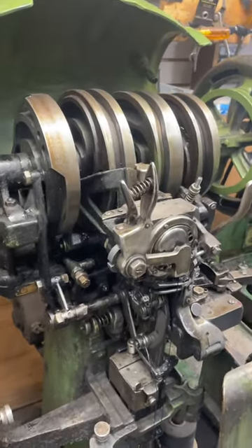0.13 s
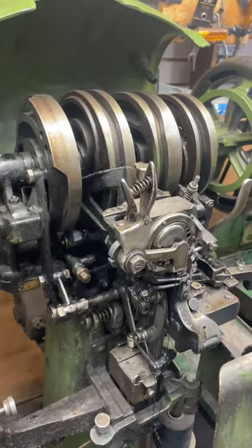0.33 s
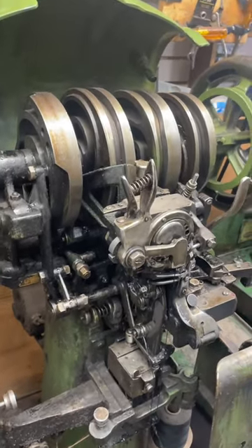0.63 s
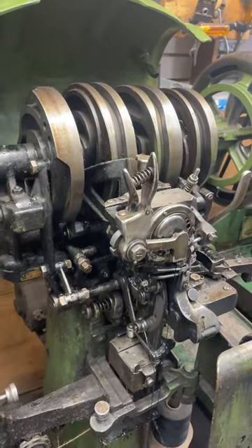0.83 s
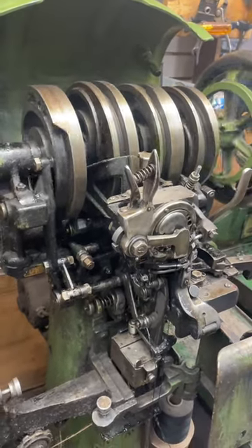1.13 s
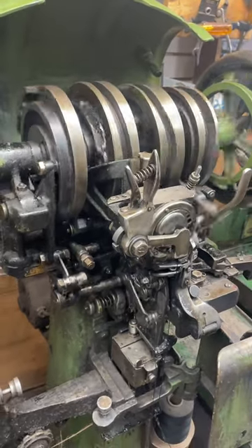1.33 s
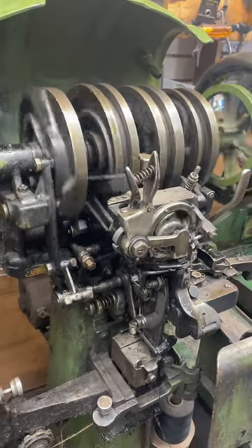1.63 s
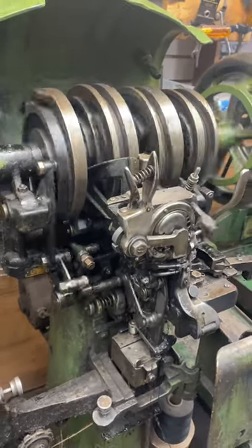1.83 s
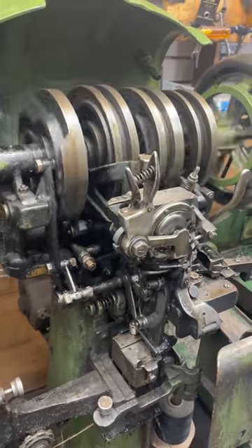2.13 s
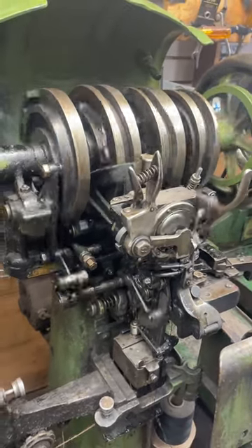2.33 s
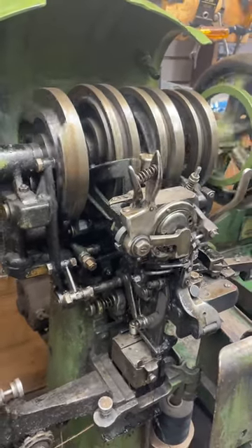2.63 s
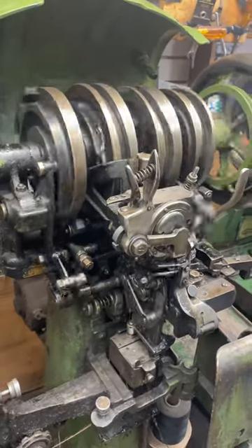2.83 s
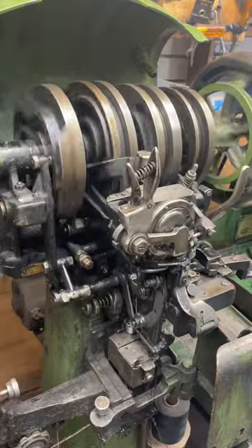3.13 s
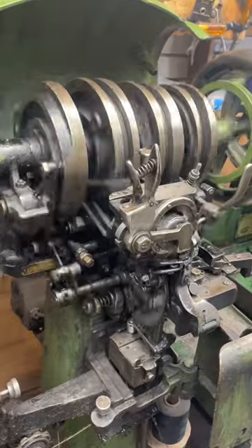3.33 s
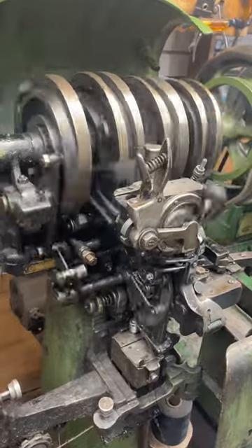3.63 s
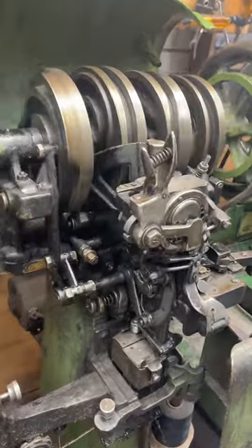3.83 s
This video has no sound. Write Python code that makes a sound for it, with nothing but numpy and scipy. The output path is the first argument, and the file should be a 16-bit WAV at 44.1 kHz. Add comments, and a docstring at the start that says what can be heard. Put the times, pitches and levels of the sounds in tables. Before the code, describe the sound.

Close up in a small workshop, an industrial stitcher hums quietly, engages with a clunk and a brief hiss, then clatters through repeating metallic strokes that speed up, with dull thuds, tiny squeaks and rattling joints.

```python
"""A heavy sole stitcher in a small workshop, heard from close by. Its motor hums, the clutch clunks in and
slips with a hiss, then the camshaft turns about six times, gathering speed. On each turn the same levers strike
in the same order, each impact exciting that part's own damped resonances. The heavy blows thud in a low mode of
the cast frame and the thread gives brief squeaks of falling pitch with each slide stroke, over gear rumble and
loose rattle."""
import sys
import numpy as np
from scipy import signal
from scipy.fft import rfft, irfft, next_fast_len
from scipy.io import wavfile
from scipy.ndimage import uniform_filter1d

SR = 44100
rng = np.random.default_rng(int(sys.argv[2]) if len(sys.argv) > 2 else 0)


def to_wav(s):
    """Save 16-bit WAV."""
    ch = np.atleast_2d(s).T  # columns
    pcm = np.round(np.clip(ch, -1, 1) * 32767)  # PCM
    wavfile.write(sys.argv[1], SR, pcm.astype(np.int16))


N = 176400

# Strokes of the clutch, then of each part in its order within a turn: start_s, level_db
CLUTCH = [(0.743, -18), (0.76, -22.5)]
FEED_KNOCK = [(1.2265, -22.5), (1.8167, -8), (2.271, -8), (2.7742, -10), (3.2532, -9), (3.582, -8),
              (3.8861, -11)]
PAWL_CLICK = [(1.3493, -12.5), (1.8793, -8), (2.3387, -8.5), (2.8534, -10), (3.3055, -6.5), (3.6115, -5),
              (3.916, -6.5)]
LEVER_CLACK = [(1.3953, -6), (1.9017, -2.5), (2.365, -2), (2.881, -4), (3.3247, -3), (3.6325, -3.5),
               (3.6449, -5.5), (3.9362, -7.5), (3.949, -7.5)]
SPRING_RETURN = [(1.4571, -9.5), (1.9539, -7), (2.4227, -13), (2.9452, -14), (3.362, -5), (3.67, -10),
                 (3.9829, -12)]
LATCH_TICK = [(1.5514, -11.5), (2.0203, -11.5), (2.4955, -11.5), (3.018, -13), (3.4143, -9.5),
              (3.7229, -7.5)]
AWL_PUNCH = [(1.5838, -24), (2.0464, -19), (2.5222, -22), (3.0453, -21), (3.4311, -14.5), (3.7397, -15)]
AWL_REBOUND = [(1.6096, -14), (2.0696, -9.5), (2.55, -13), (3.0699, -12.5), (3.4477, -9), (3.7556, -10.5)]
SLIDE_SCRAPE = [(1.6681, -7.5), (2.1218, -5), (2.6081, -8), (3.1241, -6), (3.4856, -1.5), (3.7911, -4.5)]
STOP_KNOCK = [(1.7149, -5.5), (2.166, -5), (2.6569, -5.5), (3.1623, -3.5), (3.5127, -2.5), (3.817, -2)]
CAM_TAP = [(1.7639, -18.5), (1.8587, -8.5), (2.2194, -22), (2.3167, -17), (2.7307, -25), (2.8285, -21),
           (3.799, -3.5)]
# Envelope of the running noise: time_s, mids_db, bass_db
RUNNING = [(0.8, -57, -49.5), (1.2, -40, -41), (1.6, -33, -35), (2.95, -32, -36), (3.4, -25, -28),
           (4.0, -30, -32)]
# Spectrum of rubbing cams and small ticks: frequency_hz, level_db
CAMS = [(350, -47), (650, -1.5), (1150, 3), (5600, -5.5), (8000, -15.5), (14000, -22.5)]
STROKE_SPREAD = 0.011  # relative scatter of pitch from blow to blow


def undb(db):
    """Decibels to amplitude ratio."""
    return 10 ** (np.asarray(db) / 20)


def unit(x):
    """Normalisation to rms 1."""
    return x / np.sqrt(np.mean(x ** 2))


def fade(t, t60):
    """Exponential decay, 60 dB down at t60."""
    return np.exp(-np.log(1000) * t / t60)


def colour(x, points):
    """Minimum-phase filter through (frequency_hz, gain_db) points: causal, so attacks stay sharp."""
    size = next_fast_len(x.shape[-1] + 4096, real=True)
    size += size % 2
    hz, db = np.array(points, float).T
    f = np.arange(size // 2 + 1) * SR / size
    cepstrum = irfft(np.log(undb(np.interp(np.log(f + 1), np.log(hz), db))))
    cepstrum[1:size // 2] *= 2
    cepstrum[size // 2 + 1:] = 0
    return irfft(rfft(x, size) * np.exp(rfft(cepstrum)))[..., :x.shape[-1]]


def noise(size):
    """Partly coherent stereo noise: the sides are alike in the bass and differ higher up."""
    # Side signal relative to mid: frequency_hz, gain_db
    width = [(100, -34.5), (800, -2.5), (3600, -3.5), (7000, -11.5)]
    mid, side = rng.standard_normal((2, size))
    return mid + colour(side, width) * np.array([[1], [-1]])


def walk(rate_hz):
    """Smoothed random steps: a slow wander with a spread near 1."""
    hold = int(SR / rate_hz)
    steps = np.repeat(rng.standard_normal(N // hold + 1), hold)
    return 1.3 * uniform_filter1d(uniform_filter1d(steps, hold), hold)[:N]


def ring(t, hz, t60):
    """Free vibration of one damped mode, reaching each side in its own phase."""
    return np.sin(2 * np.pi * hz * t + rng.random((2, 1))) * fade(t, t60)


def through(x, response):
    """Convolution with a stereo impulse response."""
    return signal.fftconvolve(np.atleast_2d(x), response, axes=1)[:, :x.shape[-1]]


def add(out, start, sound):
    """Superposition of a sound from a start time in seconds."""
    i = int(start * SR)
    out[:, i:i + sound.shape[-1]] += sound[..., :N - i]


def room(x, t60_s=0.75, gain_db=-15, damping_hz=5470):
    """Reverberation: the workshop's reflections merge into a short, dull tail."""
    t = np.arange(SR // 2) / SR
    tail = noise(len(t)) * fade(t, t60_s) * np.minimum(t / 0.027, 1)
    tail = tail / np.sqrt(np.sum(tail ** 2) / 2)
    return undb(gain_db) * through(x, signal.lfilter(*signal.butter(1, damping_hz, fs=SR), tail))


def workshop_air(level_db=-49):
    """Ambient noise: steady, broadband and strongest in the bass."""
    # Spectrum of the background: frequency_hz, level_db
    spectrum = [(30, -22), (120, -10.5), (190, -18.5), (480, -19), (650, -29), (5600, -39.5), (14500, -53)]
    return undb(level_db) * unit(colour(noise(N), spectrum))


def motor(first_tick_s=0.061, turn_s=0.089, tick_db=-46.5):
    """A hum with random amplitude and frequency modulation; the pulley ticks once a revolution."""
    # Tone of the motor: pitch_hz, level_db
    tones = [(118.4, -46.5)]
    # Modes of the pulley: pitch_hz
    pulley_hz = [970, 2400]
    hum = 0
    for hz, db in tones:
        amplitude = undb(db + 2.9 * walk(36))
        hum += amplitude * np.sin(2 * np.pi * np.cumsum(hz * (1 + 0.0324 * walk(15))) / SR)
    t, ticks = np.arange(SR // 10) / SR, np.zeros((2, N))
    for start in np.arange(first_tick_s, N / SR, turn_s):
        tick = rng.random() * colour(noise(len(t)), CAMS) * undb(6) * fade(t, .035)
        for hz in pulley_hz:
            tick += rng.random() * ring(t, hz * (1 + STROKE_SPREAD * rng.standard_normal()), t60=0.043)
        add(ticks, start, tick)
    return hum + undb(tick_db) * ticks


def clutch_slip(level_db=-41, slip_s=0.96):
    """Sliding friction: the clutch hisses until the shaft has caught up."""
    # Spectrum of the friction: frequency_hz, level_db
    spectrum = [(200, 10), (440, 21.5), (750, -8), (5000, -3), (12500, -5.5), (14000, -15)]
    age = np.maximum(np.arange(N) / SR - CLUTCH[0][0], 0)
    envelope = np.minimum(age / .01, 1) * np.exp(-(age / slip_s) ** 2)
    return undb(level_db) * unit(colour(noise(N), spectrum)) * envelope


def rattle(per_s=80, scatter_db=6.5, joints=5):
    """Loose joints collide as a Poisson process, each with its own impulse response."""
    t, out = np.arange(SR // 10) / SR, np.zeros((2, N))
    for _ in range(joints):
        hits = rng.random(N) < per_s / joints / SR
        strength = undb(scatter_db * np.clip(rng.standard_normal(N), -2, 1))
        out += through(hits * strength, noise(len(t)) * fade(t, 0.07))
    return unit(colour(out, CAMS))


def drive(gear_db=1, cam_db=-7, rattle_db=-3.5, flutter_db=6.5):
    """Contact noise: gears rumble, cams rub and joints rattle once the clutch is in."""
    # Spectrum of the gear rumble: frequency_hz, level_db
    rumble = [(30, -24), (70, -10), (120, -4), (400, 3.5), (600, -14.5), (1000, -41)]
    t = np.arange(N) / SR
    times, *levels = np.array(RUNNING).T
    mids, bass = (undb(np.interp(t, times, db)) for db in levels)
    engaged = np.clip((t - CLUTCH[0][0]) / 0.012, 0, 1)
    cams = undb(cam_db + flutter_db * np.clip(walk(40), -2, 1)) * unit(colour(noise(N), CAMS))
    gears = undb(gear_db + 2.45 * walk(24.46)) * unit(colour(noise(N), rumble))
    return engaged * (mids * (cams + undb(rattle_db) * rattle()) + bass * gears)


def spring(pitch_hz=3383, t60_s=0.57, relative_db=-1):
    """Free vibration of the spring after each return, its level following the running mids."""
    t, out = np.arange(SR // 2) / SR, np.zeros((2, N))
    times, mids_db, _ = np.array(RUNNING).T
    for start, _ in SPRING_RETURN:
        add(out, start, undb(relative_db + np.interp(start, times, mids_db)) * ring(t, pitch_hz, t60_s))
    return out


def steelwork(blows, t60_s=0.21):
    """Sympathetic resonance: every blow sets the shafts and springs ringing."""
    # Modes of the steelwork: pitch_hz, gain_db
    modes = [(846, 9), (1110, 8.5), (1230, 6.5), (1921, 3), (2959, -7)]
    t = np.arange(SR // 2) / SR
    scale = 2 * np.log(1000) / (t60_s * SR)  # unit gain at resonance
    return through(blows, scale * sum(undb(db) * ring(t, hz, t60_s) for hz, db in modes))


def squeaks(end_hz=3950, drop_hz=570, fall_s=0.0096, decay_s=0.014, gain_db=-7, roughness=0.036):
    """Stick-slip friction: the thread gives brief squeaks of falling pitch with each slide stroke."""
    # A squeak on each scrape and one more at full speed: start_s, level_db
    slips = SLIDE_SCRAPE + [(3.741, -6.5)]
    t, out = np.arange(SR // 10) / SR, np.zeros((2, N))
    for start, db in slips:
        jitter = unit(uniform_filter1d(rng.standard_normal(len(t)), size=30))
        hz = (end_hz + drop_hz * np.exp(-t / fall_s)) * (1 + roughness * jitter)
        envelope = undb(0.71 * jitter[::-1]) * (1 - np.exp(-t / 0.0019)) * np.exp(-t / decay_s)
        add(out, start, undb(db + gain_db) * envelope * np.sin(2 * np.pi * np.cumsum(hz) / SR))
    return out


def thuds(frame_hz=356.6, t60_s=0.061, rise_s=0.003, spread=0.025, gain_db=8, stand_db=-23):
    """Heavy blows excite low damped modes of the cast frame and its stand, scattered in pitch."""
    # Blows on the frame: start_s, level_db
    blows = [(1.227, -25), (1.585, -18), (1.715, -16.5), (1.824, -19.5), (1.913, -20.5), (2.049, -13.5),
             (2.165, -14.5), (2.235, -24), (2.275, -19), (2.372, -20.5), (2.526, -14.5), (2.658, -17.5),
             (2.779, -19), (3.047, -14), (3.163, -15), (3.257, -17), (3.433, -13), (3.513, -21.5),
             (3.583, -13.5), (3.646, -22), (3.739, -14.5), (3.818, -20), (3.893, -18.5)]
    t, out = np.arange(SR // 4) / SR, np.zeros((2, N))
    swell = 1 - np.exp(-(t / rise_s) ** 2)
    for start, db in blows:
        phase_per_hz = 2 * np.pi * t * (1 + spread * rng.standard_normal())
        frame = fade(t, t60_s) * np.sin(frame_hz * phase_per_hz)
        stand = undb(stand_db) * fade(t, 0.15) * sum(np.sin(hz * phase_per_hz) for hz in (147.2, 261.7))
        add(out, start, undb(db + gain_db) * swell * (frame + stand))
    return out


def strokes(rows, gain_db, contact_s, t60, colour_db, modes, split_hz=3000, treble_t60_s=0.079):
    """Impact excitation: a chatter of contacts drives one part's modes; the highs are damped first."""
    # Points at which colour_db is given: frequency_hz
    colour_hz = [450, 1500, 5200, 10500]
    # Passband common to all parts: frequency_hz, gain_db
    passband = [(40, -13), (150, 0.5), (11500, 0), (14000, -20)]
    t, out = np.arange(SR // 5) / SR, np.zeros((2, N))
    spectrum = list(zip(colour_hz, colour_db))
    for start, db in rows:
        dense = noise(len(t))  # many overlapping modes
        low = signal.lfilter(*signal.butter(2, split_hz, fs=SR), dense)
        damped = (low + (dense - low) * fade(t, treble_t60_s)) * fade(t, t60)
        body = colour(damped, spectrum) / np.std(colour(dense, spectrum))
        detune = 1 + STROKE_SPREAD * rng.standard_normal()
        tones = sum(undb(level) * np.sqrt(2) * ring(t, hz * detune, decay) for hz, level, decay in modes)
        contacts = rng.standard_normal(len(t)) * (rng.random(len(t)) < .02)
        contacts *= t / contact_s * np.exp(1 - t / contact_s)
        contacts[0] = 2  # the first impact
        blow = through(contacts, colour(body, passband) + tones)
        rms = np.sqrt(np.sum(blow ** 2) / (2 * SR * 0.014))  # as if its energy lay within 14 ms
        add(out, start, blow * undb(db + gain_db) / rms)
    return out


def stitcher():
    """Cyclic impacts: the clutch engages, then the cam-driven parts strike in turn."""
    # Struck parts: strokes, gain_db, contact_s, t60_s, colour_db, modes (pitch_hz, level_db, t60_s)
    parts = [ (CLUTCH, -8.5, 0.003, 0.092, [6, 11.5, 9, -10], [(451, 2.5, 0.17), (304, -0.5, 0.17)]),
             (FEED_KNOCK, -10.5, 0.00077, 0.11, [-14.5, 2, 2, -1.5], [(2980, -10.5, 0.089)]),
             (PAWL_CLICK, -14.5, 0.00086, 0.15, [-17, 3, 3.5, -3.5], []),
             (LEVER_CLACK, -13.5, 0.0023, 0.081, [-5, 6, 9.5, -2], [(1798, -8.5, 0.058),
             (1600, -23.5, 0.068), (5360, -4.5, 0.033)]),
             (SPRING_RETURN, -12.5, 0.0047, 0.099, [-6.5, 9, 4.5, 3.5], []),
             (LATCH_TICK, -11.5, 0.0021, 0.015, [-15, 8.5, 1.5, 2.5], [(2587, -15.5, 0.036)]),
             (AWL_PUNCH, -2.5, 0.0048, 0.12, [-17, 5.5, 5, -5], []),
             (AWL_REBOUND, -10.5, 0.0031, 0.023, [-18, -1.5, 1, -13.5], [(2003, -4.5, 0.023)]),
             (SLIDE_SCRAPE, -14, 0.0081, 0.061, [-4, 4.5, 5.5, -2.5], []),
             (STOP_KNOCK, -15.5, 0.0017, 0.045, [-24.5, 3, 3.5, -8], [(5023, 2, 0.019)]),
             (CAM_TAP, -20, 0.0005, 0.054, [-13.5, 13, 10, 8], [(998, -2, 0.021)]), ]
    return sum(strokes(*part) for part in parts)


def scene():
    """Superposition of the blows, their resonances and reverberation, and the running noise."""
    blows = stitcher() + squeaks()
    machine = blows + steelwork(blows) + spring() + thuds()
    return machine + room(machine) + drive() + clutch_slip() + motor() + workshop_air()


def record(dry, top_hz=16300):
    """Level and phase differences between the channels, then a low-pass; the low mids lean left."""
    # Excess of left over right: frequency_hz, level_db
    left_bias = [(200, -1.5), (380, 4), (700, 8.5), (2400, 1), (4400, 0)]
    # Lead of right over left: frequency_hz, phase_rad
    right_lead = [(500, 0.14), (3200, 1), (4000, 1.02), (5300, 0.52), (7000, -3), (9000, -4.5), (10500, -6),
                  (12000, -5), (14000, -9.5)]
    # each channel takes half of each difference
    tilted = np.array([colour(x, [(hz, side * db / 2) for hz, db in left_bias])
                       for x, side in zip(dry, (1, -1))])
    phase = np.interp(np.arange(N // 2 + 1) * SR / N, *np.array([(0, 0)] + right_lead).T)
    shifted = irfft(rfft(tilted) * np.exp(.5j * np.array([-phase, phase])), N)
    return signal.sosfilt(signal.ellip(8, .2, 70, top_hz, fs=SR, output="sos"), shifted)


dry = scene()
out = record(dry)
to_wav(out)
```